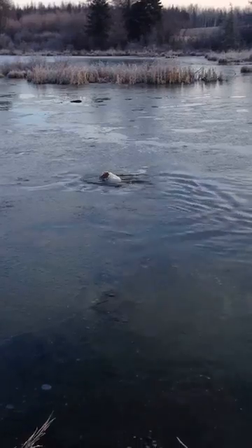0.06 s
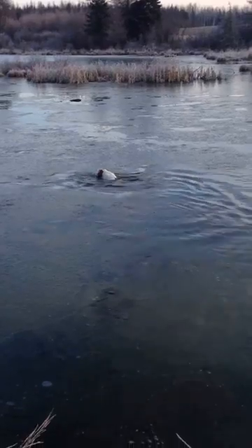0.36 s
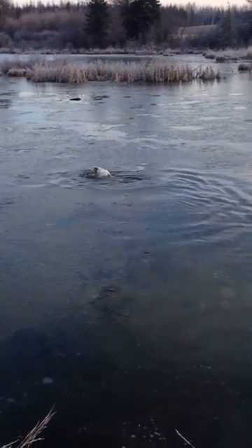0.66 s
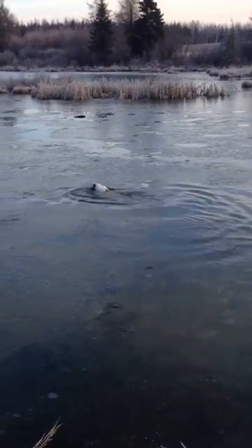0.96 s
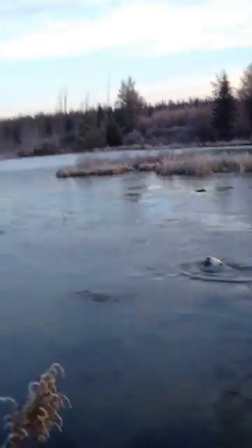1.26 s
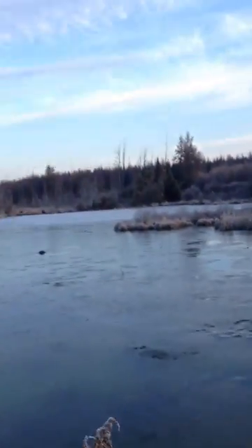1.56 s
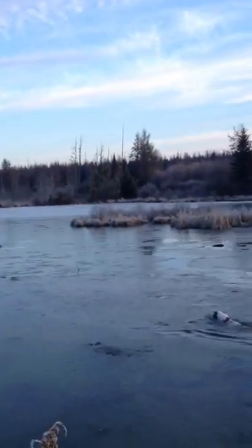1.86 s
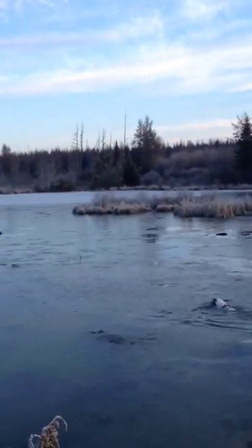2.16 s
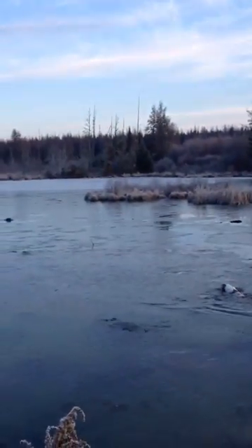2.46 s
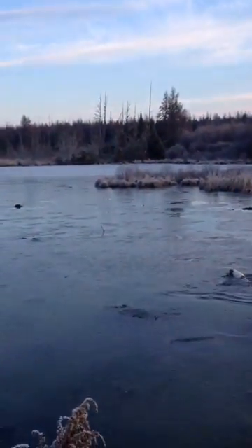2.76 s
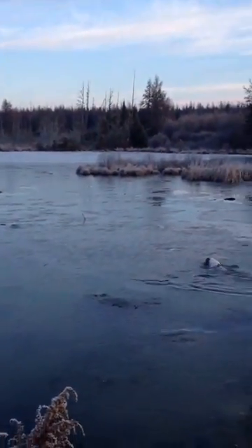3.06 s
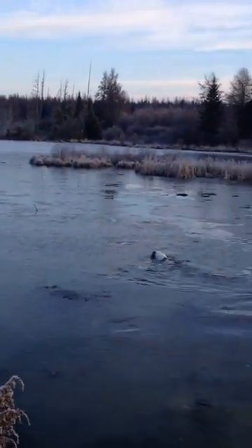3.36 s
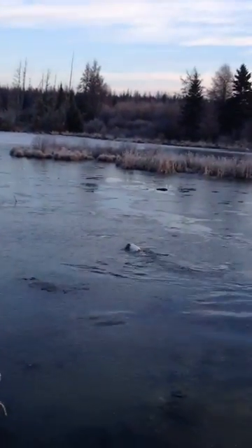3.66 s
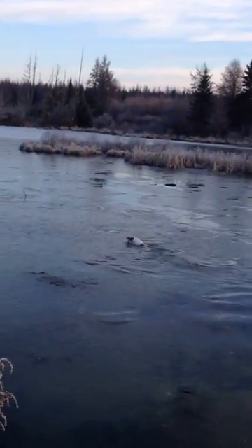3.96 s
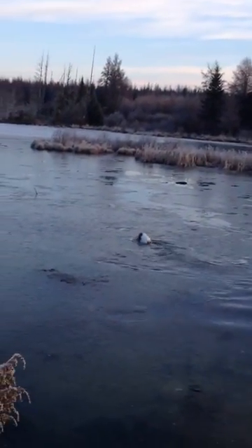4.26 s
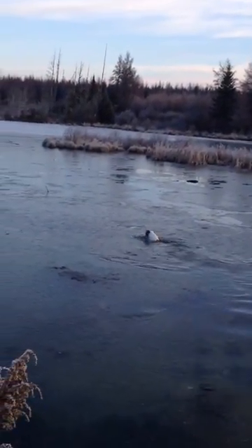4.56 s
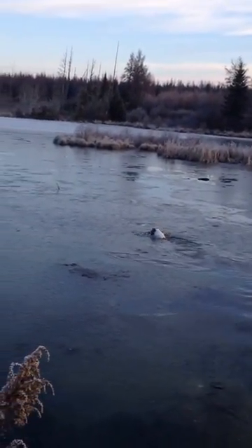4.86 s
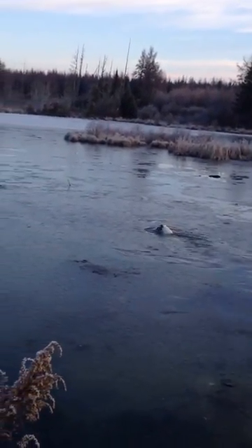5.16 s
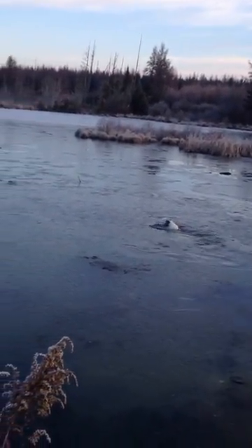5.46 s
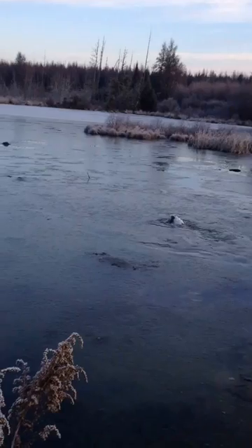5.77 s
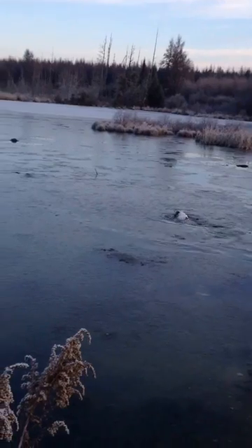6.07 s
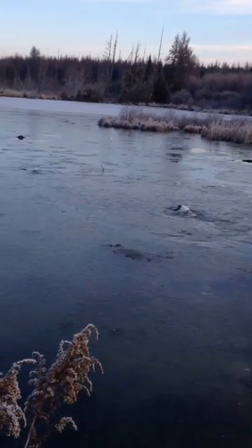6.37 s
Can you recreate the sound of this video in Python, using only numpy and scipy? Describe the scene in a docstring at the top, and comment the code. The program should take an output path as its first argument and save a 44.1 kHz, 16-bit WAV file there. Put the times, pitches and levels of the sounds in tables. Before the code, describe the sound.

A dog swims through thin ice on a pond, some way from a single microphone at the edge. At first the sloshing is dull because a finger covers the microphone. The finger rubs, knocks sharply twice and lifts away. The sound opens up: with each paddle stroke the ice crackles and snaps, shards clink and water plops, over a low, steady outdoor rumble.

```python
"""Dog swimming through pond ice

At the pond's edge, one microphone, the dog some way off. With each paddle stroke the thin sheet crackles
and snaps, shards clink, and bubbles ring as the water sloshes and plops. At first a finger lies over the
microphone port and only dull water gets past; it rubs, knocks on the case and lifts off, and from then
on the ice is bright and open over a low, steady rumble."""
import sys
import numpy as np
from scipy import signal
from scipy.fft import rfft, irfft
from scipy.io import wavfile

SR = 44100
rng = np.random.default_rng(int(sys.argv[2]) if len(sys.argv) > 2 else 0)


def to_wav(sig):
    """Store sig (one row per channel, or 1-D mono) as 16-bit WAV at the path in sys.argv[1].

    Samples outside -1..1 are clipped; the rate is SR.
    """
    pcm = np.clip(np.atleast_2d(sig), -1, 1) * 32767
    pcm = np.round(pcm).astype(np.int16)
    wavfile.write(sys.argv[1], SR, pcm.T)  # frames by channels


N = 287532
TIME = np.arange(N) / SR
LIFT_S = (1.62, 1.70)   # the finger leaves the port between these times

# outdoor air with the port covered, and with it open: f/Hz, relative density/dB
COVERED_SPECTRUM = [(40, -30.5), (90, -7.5), (220, -1.5), (400, -11), (560, -18.5), (800, -11),
                    (1050, -17.5), (1320, -9), (1700, -23), (2100, -18.5), (4800, -31), (14000, -34.5)]
OPEN_SPECTRUM = [(40, -74), (90, 5.5), (220, 0.5), (480, 2.5), (850, -8.5), (1400, -7), (3000, -9.5),
                 (6500, -15), (15500, -17)]
# skin sliding right at the microphone: f/Hz, relative density/dB
SKIN_SPECTRUM = [(3900, -11.5), (4750, 5.5), (5900, -2), (8000, -0.5), (11000, -6.5)]
# resonances of the case, and of the gap under the finger: f/Hz, width/Hz, gain/dB
CASE_MODES = [(980, 230, 0.5), (1400, 160, 4.5), (1630, 320, -1.5), (2140, 540, -5.5), (2820, 2300, -15)]
GAP_MODES = [(5030, 560, -7.5), (6800, 370, 1), (9100, 1100, -11), (13500, 2500, -24)]
# the finger slides on the case: t/s at full pressure, attack/s, hold/s, release/s, pressing/dB, sliding/dB
FINGER_RUBS = [(0.94, 0.026, 0.0082, 0.062, -34, -49), (1.112, 0.065, 0.044, 0.065, -25.5, -44),
               (1.275, 0.007, .004, 0.037, -48, -71), (1.331, 0.22, 0.092, 0.4, -39, -50.5),
               (1.657, 0.046, 0.0032, 0.039, -44, -35)]
# the finger bumps the case: t/s, knock/dB, f/Hz, t60/s, thump/dB, relative tick level/dB
FINGER_KNOCKS = [(0.9324, -12, 1400, 0.0086, -45, -25), (.953, -25, 1200, 0.0083, -25, -61),
                 (0.9694, -24.5, 1510, 0.0087, -56, -47), (1.04, -35, 970, 0.0091, -29, -65),
                 (1.155, -4, 1310, 0.0097, -17, -18), (1.1575, 11.5, 1310, 0.001, -8.5, -20),
                 (1.1608, 4, 2190, 0.0037, -11.5, -38), (1.336, -14.5, 860, 0.0032, -33, -21),
                 (1.555, -22.5, 1100, 0.0027, -38, -53), (1.583, -2.5, 1280, 0.0022, -38, -25.5),
                 (1.634, -5, 1340, 0.0016, -33.5, -12), (1.6461, -9.5, 815, 0.0075, -17, -18),
                 (1.6572, -23, 1090, 0.0014, -15.5, 1), (1.659, -2, 975, 0.0087, -4.5, -15),
                 (1.6605, 2.5, 1097, 0.002, -7.5, -5), (1.6685, -8.5, 1090, 0.0034, -13.5, -8),
                 (1.672, -32, 700, 0.0044, -19.5, -11), (1.6844, -11.5, 1660, 0.0043, -20, -1.5),
                 (1.7038, -27.5, 1010, 0.023, -43.5, -20.5)]
# air pops through the gap and sets it squeaking: t/s, impulse level/dB
GAP_SQUEAKS = [(1.163, 15.5), (1.1652, 13), (1.174, 1.5)]
# water and breaking ice, some way off: f/Hz, relative density/dB
WATER_SPECTRUM = [(60, -17), (170, 3.5), (320, -3.5), (500, 2.5), (680, -2), (870, 2.5), (1130, -1.5),
                  (1380, -1.5), (1800, -7.5), (2450, -6), (3400, -18.5), (6000, -15.5), (15000, -22)]
ICE_SPECTRUM = [(500, -1.5), (1200, 6.5), (2500, 6), (3600, 4), (4700, 6.5), (6500, 2), (9500, 3),
                (12000, 3), (14400, 8), (15500, -3)]
# the wake laps and rustles, louder as the dog nears the microphone: t/s, water/dB, relative ice level/dB
WAKE_LEVELS = [(1.95, -68.5, -86.5), (2.35, -61, -63.5), (3.0, -59.5, -74.5), (3.7, -59, -59),
               (4.8, -57, -66), (5.451, -60, -68.5), (6.5, -56, -63.5)]
# paddle strokes push water and crush the ice edge: t/s at the crest, length/s, water/dB, relative ice/dB
PADDLE_STROKES = [(1.856, 0.036, -54.5, -55), (2.22, 0.14, -59.5, -62.5), (2.494, 0.25, -63.5, -60),
                  (2.784, 0.06, -61, -59), (2.905, 0.054, -59, -78), (3.14, 0.35, -69, -62),
                  (3.337, 0.058, -61, -58), (3.582, 0.067, -58, -55), (4.02, 0.26, -67, -54.5),
                  (4.14, 0.15, -52, -54), (4.243, 0.045, -54, -74), (4.378, 0.11, -60, -55.5),
                  (4.645, 0.11, -52.5, -58), (4.897, 0.09, -46.5, -59), (5.067, 0.1, -55, -55.5),
                  (5.243, 0.052, -54.5, -72), (5.384, 0.046, -53.5, -73), (5.622, 0.11, -54, -63.5),
                  (5.746, 0.13, -57, -58), (5.978, 0.44, -68, -59), (6.232, 0.15, -53, -79),
                  (6.344, 0.098, -49, -52)]
# early strokes, heard through the finger: t/s at the crest, length/s, water before muffling/dB
COVERED_STROKES = [(0.027, 0.056, -62.5), (0.165, 0.13, -56.5), (0.37, 0.061, -59), (0.753, 0.091, -54)]
# paws and floes plop into the pond: t/s, relative level/dB, starting bubble f/Hz
WATER_PLOPS = [(.336, -38.5, 720), (.772, -42.5, 613), (1.853, -38.5, 766), (2.357, -45.5, 357),
               (2.615, -43.5, 860), (2.837, -38.5, 1640), (2.966, -42, 924), (3.118, -40.5, 1310),
               (3.637, -40.5, 1290), (3.262, -42.5, 1344), (3.336, -40.5, 850), (3.721, -40.5, 886),
               (3.979, -41.5, 458), (4.134, -35, 866), (4.308, -39.5, 880), (4.355, -40.5, 1350),
               (4.464, -36.5, 820), (4.527, -40.5, 398), (4.541, -38, 960), (4.616, -33.5, 501),
               (5.056, -35, 540), (5.206, -39.5, 502), (5.373, -43, 444), (5.556, -39.5, 545),
               (5.745, -37.5, 690), (5.966, -37, 894), (6.318, -36.5, 553), (6.348, -37, 680)]
# loose shards meet: t/s, relative level/dB, f/Hz
SHARD_CLINKS = [(2.1324, -49, 12300), (2.7018, -47, 14000), (3.21, -29, 13600), (3.3054, -35, 14100),
                (3.32, -41, 14000), (3.3258, -36, 14300), (3.4211, -42, 13100), (3.6386, -35, 13600),
                (4.578, -38, 13500), (4.682, -39.5, 13100), (4.7192, -44, 13700), (5.0474, -46, 13400),
                (5.1193, -43, 13000), (5.1404, -38, 13300), (5.238, -45, 13200), (5.722, -39, 13000),
                (5.7887, -38, 14500), (6.0107, -36, 13300), (6.4098, -43, 12600)]
# the ice sheet snaps: t/s, relative level/dB
ICE_SNAPS = [(1.8393, -40.5), (2.203, -43), (2.7557, -41.5), (3.21, -31), (3.2474, -37), (3.3055, -55),
             (3.635, -45), (3.726, -31), (3.947, -32.5), (4.044, -35), (4.0646, -40), (4.0925, -34.5),
             (4.115, -31.5), (4.424, -37), (4.623, -34.5), (4.701, -39), (4.86, -43.5), (5.238, -39),
             (5.328, -41), (5.413, -41.5), (5.548, -43), (5.723, -37), (5.97, -35.5), (6.294, -36.5),
             (6.503, -36.5)]


def from_db(db):
    """Decibels to gain."""
    return 10 ** (np.asarray(db) / 20)


def unit_rms(x):
    """Scale to unit power."""
    return x / np.sqrt(np.mean(x ** 2) + 1e-20)


def add(out, s, sound):
    """Mix a short sound in at s seconds."""
    start = max(round(s * SR), 0)
    out[start:start + len(sound)] += sound[:max(N - start, 0)]


def colour(x, spectrum):
    """Shape by a smooth spectrum, keeping the power of white input."""
    hz, db = np.transpose(spectrum)
    bins = np.maximum(np.fft.rfftfreq(2 * N, 1 / SR), 1)
    gain = unit_rms(from_db(np.interp(np.log(bins), np.log(hz), db)))
    return irfft(rfft(x, 2 * N) * gain)[:N]


def cut(x, hz, kind, order=2):
    """Butterworth low- or high-pass."""
    return signal.sosfilt(signal.butter(order, hz, kind, fs=SR, output="sos"), x + 1e-18)


def resonate(x, modes):
    """Parallel resonances of alternating sign, each given as f/Hz, width/Hz, gain/dB."""
    out = 0
    for k, (hz, width, db) in enumerate(modes):
        r = np.exp(-np.pi * width / SR)
        ring = signal.lfilter([1, 0, -1], [1, -2 * r * np.cos(2 * np.pi * hz / SR), r * r], x + 1e-18)
        out = out + (-1) ** k * from_db(db) * (1 - r * r) / 2 * ring
    return out


def drift(per_s):
    """A random wandering curve of unit power."""
    knots = rng.standard_normal(4096)
    return unit_rms(np.interp(TIME * per_s, np.arange(len(knots)), knots))


def grains(per_s, spread_db):
    """Random clicks of uneven size and sign, at unit power."""
    sizes = from_db(spread_db * np.minimum(rng.exponential(1, N), 4)) * rng.choice([-1, 1], N)
    return unit_rms(sizes * (rng.random(N) < per_s / SR))


def decay(t60):
    """An exponential fall, a fifth of a second long."""
    return np.exp(-np.log(1000) * TIME[:SR // 5] / t60)


def ping(hz, t60, rise=0):
    """A damped sine whose pitch has moved by the share 'rise' after t60 seconds."""
    glide = 1 + rise * np.minimum(TIME[:SR // 5] / t60, 2)
    return decay(t60) * np.sin(2 * np.pi * np.cumsum(hz * glide) / SR)


def burst(t60):
    """A sudden, dying puff of noise."""
    return decay(t60) * rng.standard_normal(SR // 5)


def scatter(x, t60, wet_db):
    """Sound spreads through the sheet and glances off it, trailing a short diffuse tail."""
    tail = burst(t60)
    wet = from_db(wet_db) * signal.fftconvolve(x, tail / np.linalg.norm(tail))[:N]
    return (x + wet) / np.sqrt(1 + from_db(wet_db) ** 2)


def outdoor_air():
    """Steady rumble and hiss at the pond; until the finger lifts, treble flutters in the gap under it."""
    lifted = np.interp(TIME, LIFT_S, [0, 1])
    covered = from_db(-59) * colour(rng.standard_normal(N), COVERED_SPECTRUM)
    uneven_hiss = rng.standard_normal(N) * from_db(3.2 * drift(per_s=180))
    flutter = from_db(-68) * unit_rms(resonate(uneven_hiss, [(6800, 990, -6.5), (14000, 450, 0)]))
    open_air = from_db(-62.5) * colour(rng.standard_normal(N), OPEN_SPECTRUM)
    low_band = resonate(rng.standard_normal(N), [(184.2, 31, 0)])
    rumble = from_db(-64.5) * unit_rms(cut(low_band, 83, "high", order=3))
    return (1 - lifted) * (covered + flutter) + lifted * open_air + rumble


def faint_whistle(start_s=2.6, length_s=0.078):
    """One thin whistle falls in the high treble."""
    along = np.clip((TIME - start_s) / length_s, 0, 1)
    hz = np.interp(along, [0, 1], [13400, 11300])
    return from_db(-55) * np.sin(np.pi * along) * np.sin(2 * np.pi * np.cumsum(hz) / SR)


def rub_envelopes(range_db=32):
    """Pressing and sliding strength: each rub rises by range_db in its attack, holds and lets go."""
    out = 0
    for s, attack, hold, release, pressing_db, sliding_db in FINGER_RUBS:
        outside = np.maximum((s - TIME) / attack, (TIME - s - hold) / release).clip(min=0)
        out = out + np.outer(from_db([pressing_db, sliding_db]), from_db(-range_db * outside))
    return out


def finger_rub():
    """Skin sticks and slips: pressure shakes the case, sliding hisses and drags air over the port."""
    pressing, sliding = rub_envelopes()
    slips = grains(per_s=4600, spread_db=3)
    case = cut(resonate(slips, CASE_MODES), 830, "high", order=8)
    case = unit_rms(cut(case, 3200, "low", order=12))
    gap = from_db(-8) * unit_rms(resonate(slips, GAP_MODES))
    skin = from_db(-4) * colour(rng.standard_normal(N), SKIN_SPECTRUM)
    hiss = cut(gap + skin, 4450, "high", order=8)
    drag = unit_rms(resonate(grains(per_s=1100, spread_db=4), [(210, 110, -5), (617, 990, -7)]))
    drag = cut(cut(drag, 130, "high"), 2600, "low")
    return pressing * case + sliding * (hiss + drag)


def finger_knocks():
    """A bump rings the case, thumps air into the port and ticks as the skin lets go; the gap squeaks."""
    knocks, thumps, ticks, pops = np.zeros((4, N))
    for s, db, hz, t60, thump_db, tick_db in FINGER_KNOCKS:
        add(knocks, s, from_db(db) * ping(hz, t60))
        add(thumps, s, from_db(thump_db) * ping(hz=259, t60=0.016, rise=-0.49))   # sags as the gap closes
        add(ticks, s, from_db(tick_db - 7) * burst(t60=0.0037))
    for s, db in GAP_SQUEAKS:
        add(pops, s, from_db([db]))
    body = cut(cut(knocks, 3300, "low", order=4) + thumps, 154, "high", order=4)
    ticks = cut(cut(ticks, 1303, "high", order=1), 10000, "low", order=3)
    squeaks = cut(resonate(pops, GAP_MODES), 4900, "high", order=4)
    return body + ticks + squeaks


def stroke(crest_s, length_s, swell_share=0.42):
    """A paddle stroke swells to its crest and ebbs a little more slowly."""
    away = np.maximum((crest_s - TIME) / swell_share, (TIME - crest_s) / (1 - swell_share)) / length_s
    return 1 / np.cosh(np.minimum(np.pi / 2 * away, 20))


def swimming_envelopes():
    """Strength of water and crumbling ice at the open port: the strokes add their power to the wake."""
    times, *levels = np.transpose(WAKE_LEVELS)
    power = np.array([from_db(np.interp(TIME, times, db)) ** 2 for db in levels])
    for s, length, water_db, ice_db in PADDLE_STROKES:
        power += np.outer(from_db([water_db, ice_db]), stroke(s, length)) ** 2
    return np.sqrt(power) * np.interp(TIME, LIFT_S, [0, 1])


def slosh(water, ring_cycles=32):
    """Bubble swarms ring in a wash of spray, each size swelling on its own; dull behind the finger."""
    bubbles = np.zeros(N)
    for hz in np.geomspace(250, 3600, 24):
        swarm = grains(per_s=0.18 * hz, spread_db=6.5)   # small bubbles are the most common
        swarm *= from_db(3 * drift(per_s=32))
        ringing = signal.fftconvolve(swarm, ping(hz, ring_cycles / hz, rise=0.083))[:N]
        bubbles += unit_rms(ringing) * np.sqrt(hz)
    spray = from_db(-3) * unit_rms(colour(rng.standard_normal(N), WATER_SPECTRUM))
    wash = unit_rms(unit_rms(colour(bubbles, WATER_SPECTRUM)) + spray)
    early_strokes = sum(from_db(db) * stroke(s, length) for s, length, db in COVERED_STROKES)
    return water * wash + early_strokes * cut(wash, 2100, "low", order=4)


def plops(ring_cycles=15.8, attack_s=0.005, spread_s=0.019):
    """Each plop is a slap that traps one large bubble; four others of like size follow."""
    out = np.zeros(N)
    onset = np.minimum(TIME[:SR // 5] / attack_s, 1)
    for s, db, hz in WATER_PLOPS:
        add(out, s, from_db(db + 1.5) * onset * ping(hz, ring_cycles / hz + 0.017, rise=0.14))
        slap = cut(cut(burst(t60=0.055), 0.72 * hz, "low"), 0.8 * hz, "high", order=3)
        add(out, s, from_db(db - 27) * unit_rms(slap))
        for delay, octaves in zip(spread_s * rng.random(4), rng.normal(0, 0.25, 4)):
            bubble_hz = hz * 2 ** octaves
            add(out, s + delay, from_db(db - 6.5) * ping(bubble_hz, ring_cycles / bubble_hz, rise=0.088))
    return cut(scatter(out, t60=0.08, wet_db=-6), 170, "high")


def floe_crunch(water):
    """A hard stroke grinds floes together; this grows faster than the splash itself."""
    floe_modes = [(1470, 800, -6), (2410, 930, 3), (4270, 1240, 3)]
    grinding = unit_rms(resonate(grains(per_s=3000, spread_db=7), floe_modes))
    return from_db(-50.5) * (water / water.max()) ** 2 * grinding


def shard_clinks(width_hz=1400):
    """Two shards meet and chatter briefly at a glassy pitch."""
    out = np.zeros(N)
    for s, db, hz in SHARD_CLINKS:
        glassy = unit_rms(resonate(rng.standard_normal(SR // 5), [(hz, width_hz, 0)]))
        add(out, s, from_db(db - 6.5) * glassy * decay(t60=0.021))
    return out


def shard_ticks(crumbling):
    """As the edge crumbles, loose shards touch one by one, each with a short glassy tick."""
    touches = crumbling * grains(per_s=24, spread_db=2.5)
    ticks = signal.fftconvolve(touches, burst(t60=0.037))[:N] / np.linalg.norm(decay(t60=0.013))
    return from_db(-3.5) * resonate(ticks, [(8140, 3300, -6), (14600, 2100, 0)])


def breaking_ice(crumbling):
    """Tiny fractures come in clumps; a snap is a fast run of them through the sheet."""
    crumbs = unit_rms(grains(per_s=830, spread_db=2.5) * from_db(2.9 * drift(per_s=82)))
    crackle = from_db(0.5) * crumbling * crumbs
    runs = np.zeros(N)
    for s, db in ICE_SNAPS:
        add(runs, s, from_db(db - 9) * np.minimum(2 * decay(t60=0.029), 1))   # holds briefly, then dies
    snaps = runs * grains(per_s=9000, spread_db=3.5)
    return colour(scatter(crackle + snaps, t60=0.1, wet_db=-5.5), ICE_SPECTRUM)


def scene():
    """One channel: the air all round, the finger on the microphone, the dog out on the pond."""
    water, crumbling = swimming_envelopes()
    splashes = slosh(water) + plops()
    ice = floe_crunch(water) + breaking_ice(crumbling) + shard_ticks(crumbling) + shard_clinks()
    handling = finger_rub() + finger_knocks()
    return (outdoor_air() + faint_whistle() + handling + splashes + ice)[None]


def record(dry):
    """The microphone chain loses the deep bass, clips the highest peaks and cuts off above 15.6 kHz."""
    clipped = np.clip(cut(dry, 65, "high"), -0.88, 0.88)
    return signal.sosfilt(signal.ellip(10, 0.2, 75, 15600, fs=SR, output="sos"), clipped)


dry = scene()
out = record(dry)
to_wav(out)
```